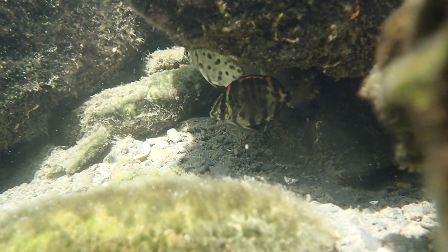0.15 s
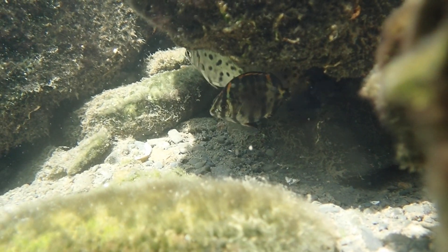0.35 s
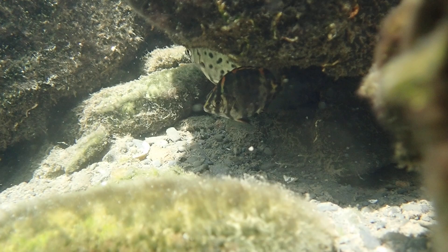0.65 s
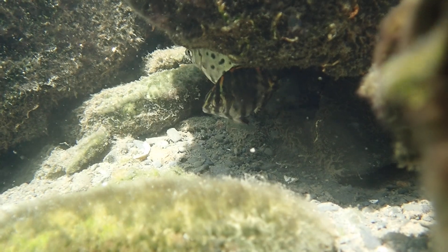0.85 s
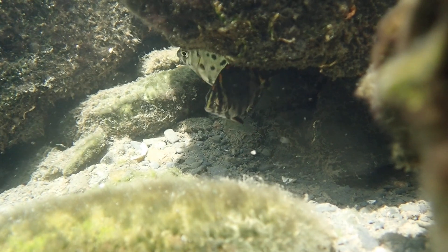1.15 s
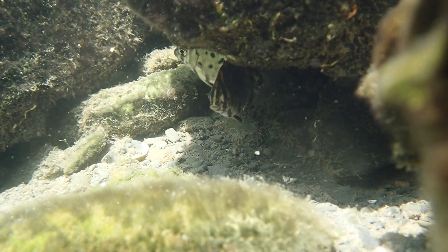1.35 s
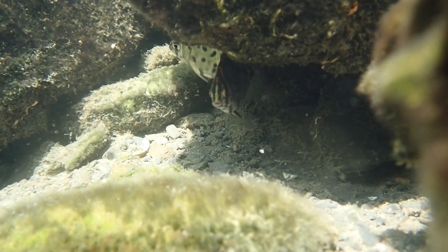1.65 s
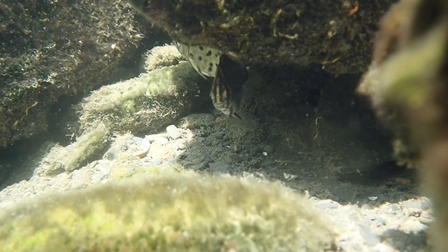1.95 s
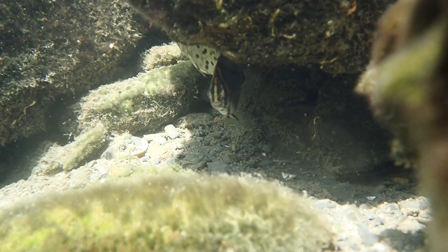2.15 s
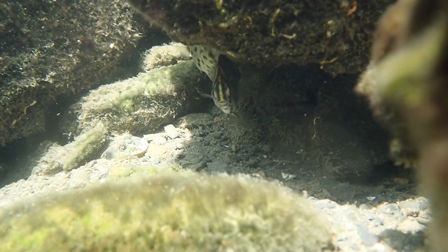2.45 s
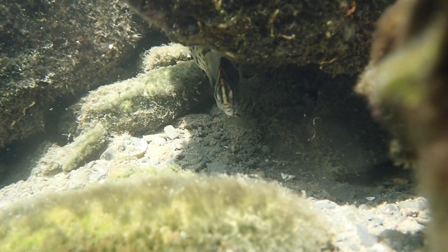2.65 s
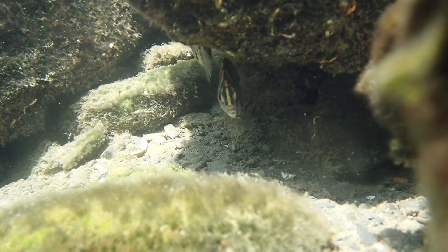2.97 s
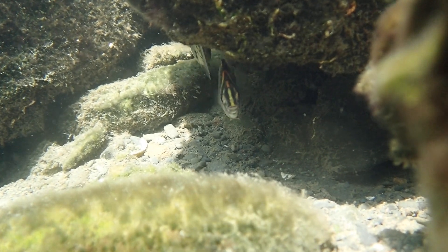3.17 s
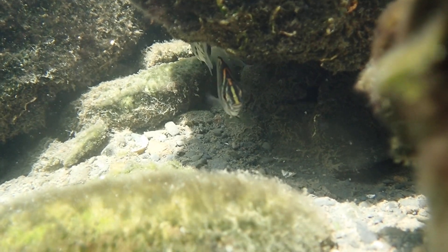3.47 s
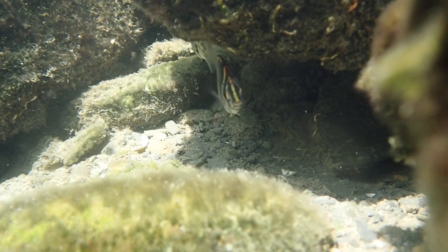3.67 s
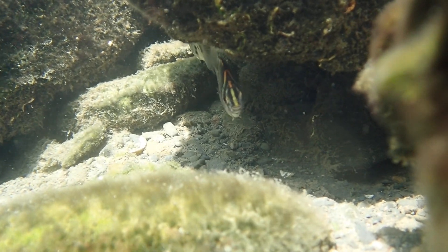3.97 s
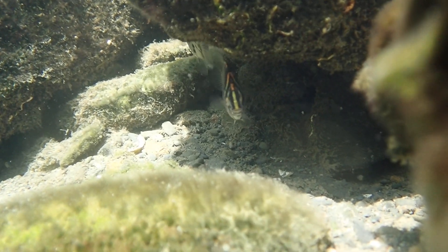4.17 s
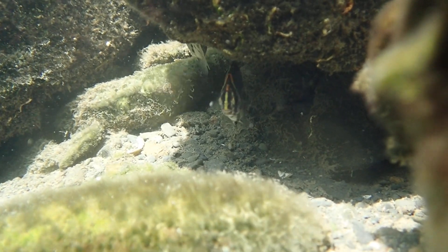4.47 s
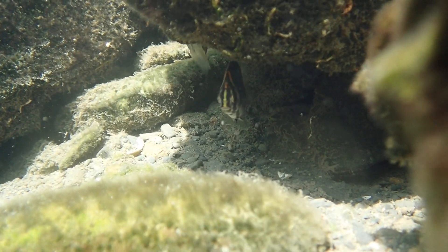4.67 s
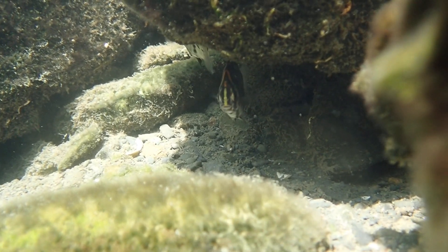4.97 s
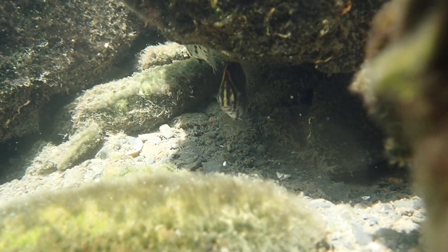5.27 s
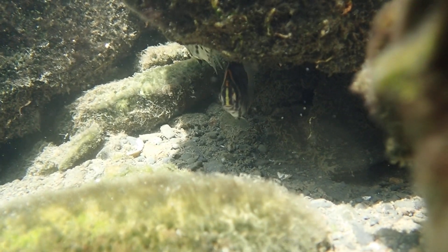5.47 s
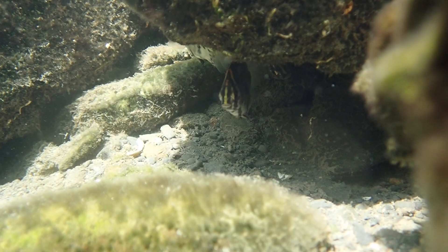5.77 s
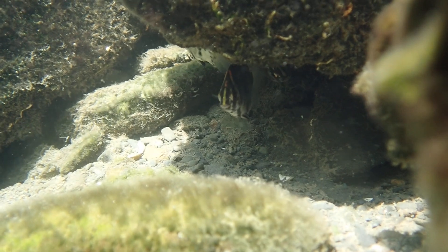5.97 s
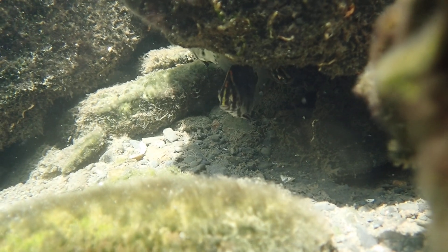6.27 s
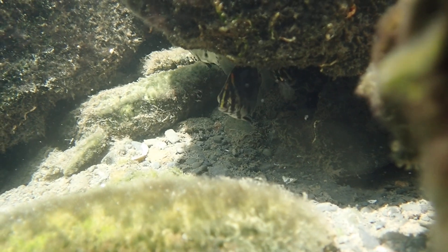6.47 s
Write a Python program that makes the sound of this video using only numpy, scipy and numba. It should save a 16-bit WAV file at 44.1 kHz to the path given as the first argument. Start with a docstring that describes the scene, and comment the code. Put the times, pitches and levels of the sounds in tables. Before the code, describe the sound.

Heard from inside a sealed camera housing underwater, a quick, irregular run of low thumps and dull clicks opens, along with brief gurgles. The knocks grow sparse while moving water rumbles and a hollow hum rises and falls. One heavy double thump follows, then another cluster of bumps as the hum swells again. Everything sounds close and muffled, with faint microphone hiss.

```python
"""Knocks thump the shell of a sealed camera housing among rocks in shallow, surging water.
Each knock swings the shell, rings the air trapped in a cavity and adds a dull crack.
The flow keeps that air humming and rumbles against the shell; water gurgles at the ports
(the openings, one per side) and grit rustles past. After each hard knock a fast limiter
turns everything down for a moment, even the microphone's hiss."""
import sys
import numpy as np
from scipy import signal
from scipy.fft import rfft, irfft, next_fast_len
from scipy.io import wavfile
from numba import njit

SR = 44100
rng = np.random.default_rng(int(sys.argv[2]) if len(sys.argv) > 2 else 0)


def store_pcm(level_fs):
    """Save levels as 16-bit WAV."""
    pcm = np.round(np.clip(level_fs, -1, 1) * 32767).astype(np.int16)
    wavfile.write(sys.argv[1], SR, np.atleast_2d(pcm).T)


N = 291965

# Knocks on the shell. Each row: start in seconds, thump level in dB, rough thump pitch in Hz,
# ring level in dB, crack level in dB, lean (each unit makes the left thump 0.46 dB above the right).
KNOCKS = [(0.077, -27, 134, -8.5, -39, 1), (0.122, -14.5, 134, -10, -41, 3), (0.148, -20, 131, -6, -29, 5),
          (0.172, -13, 160, -5.5, -24, 2), (0.197, -12, 160, -13, -43, -22),
          (0.271, 2, 190, -19.5, -33, 15.5), (0.286, -5, 160, -12, -34, -11),
          (0.352, -7, 157, -36, -50, -4), (0.395, -31, 103, -16, -28, 1), (0.412, -29, 78.5, -7.5, -29, 3),
          (0.456, -20, 120, -5.5, -37, -7), (0.471, 2, 92.6, -16, -47, -9), (0.553, -29, 283, -10, -34, -4),
          (0.62, -23, 152, -4.5, -33, -17), (0.641, -5.5, 152, -7, -51, -13), (0.68, 4, 121, 4, -12, -12),
          (0.891, -12.5, 94, -15, -59, 8), (0.91, -8, 110.5, -30, -43, 0), (0.934, 0.5, 96, -16, -44, -1.5),
          (0.984, -12, 100, -18.5, -56, 0), (1.031, 3, 91, -12, -35, 0), (1.099, 1, 102, -5.5, -22.5, 3),
          (1.169, -3.5, 173.5, -25, -54, -2), (1.206, 6.5, 85.5, -10.5, -19, 11),
          (1.306, -6, 170, -22.5, -53, -3), (1.342, -12.5, 150, -20.5, -47, -3),
          (1.53, -4, 178, -16, -25, -5), (1.549, -5.5, 150, -6.5, -29, -3),
          (1.578, -9.5, 127, -12, -42, -15), (1.609, -0.5, 139, -24.5, -56, -9.5),
          (1.664, -14.5, 161, -6.5, -40, -2), (1.692, -33.5, 276, 9.5, 0, 4.5),
          (1.71, -2, 209, 3, -10.5, -2.5), (1.751, 1.5, 164, 14.5, 2, -2), (1.785, -16, 273, 1, -24, -15),
          (1.805, -2.5, 140, 6, -62, -8), (2.073, -7, 158, -36, -61, 4), (2.093, -2.5, 158, -20, -26, -0.5),
          (2.385, -16.5, 150, -33, -61, -8), (2.779, 2.5, 105, -10, -22.5, 4),
          (3.099, -28, 156, -15, -52, -6), (3.41, -17.5, 63, -8.5, -38, -7),
          (3.557, -25, 271, -4.5, -30.5, 11), (3.61, -13.5, 57.7, -12, -38, 5),
          (3.646, 3, 152, -1.5, -20.5, -8), (3.681, 4, 229, -10.5, -28, 3.5),
          (3.705, -13, 101, 0, -50, -21.5), (4.532, 10.5, 256, 4, -9, -8.5),
          (4.557, 17, 99.4, 2.5, -9.5, -12), (5.056, -6, 153, -22, -53, -9.5),
          (5.268, -21.5, 103, -28, -59, -15), (5.312, 3, 199, 5.5, -6, 0),
          (5.409, 6, 81.8, -14.5, -23, 4.5), (5.505, 3.5, 94, -1, -37, 4), (5.82, -18, 108, -10.5, -58, -7),
          (5.907, 16, 161, -3.5, -4, -10), (6.003, 8.5, 262, 3.5, -19, 1.5),
          (6.029, -3.5, 160, -24, -28, 1), (6.052, 1, 155.6, 0, -36, 4.5),
          (6.327, -5, 151, -16.5, -61.5, -4), (6.357, 7.5, 72.3, -0.5, -43, -14.5),
          (6.402, -2.5, 112, 6, -41, 11), (6.442, -8.5, 134, 2.5, -33, 1.5),
          (6.549, 5, 134, 0.5, -15, -1.5), (6.585, 5.5, 77.6, -5.5, -40, 12)]

CAVITY_HZ, CAVITY_WIDTH_HZ = (402.9, 385.2), (38.1, 42)   # left, right
CAVITY_DB = (2, -9.5)   # the left port lies nearer the cavity
HISS_DB = (-53.5, -51)   # left, right


def thumps(cycles=0.88, sag=0.15, overshoot=1.133, settle_s=0.0052):
    """The knocked shell swings a few times, falling in pitch; the right side is later and lower."""
    out, t = np.zeros((2, N)), np.arange(SR // 5) / SR
    sides = (0.34, 0.0017, 0.9), (-0.58, 0.0021, 0.797)
    high_start = overshoot * settle_s * (1 - np.exp(-t / settle_s))
    for start, db, hz, _, _, lean in KNOCKS:
        for side, (lean_share, late_s, pitch_share) in enumerate(sides):
            turns = hz * pitch_share * (t / (1 + sag * np.sqrt(hz * t)) + high_start)
            envelope = turns / cycles * np.exp(1 - turns / cycles)
            swing = envelope * np.sin(2 * np.pi * turns)
            add(out[side], from_db(db + lean_share * lean / 2) * swing, start + late_s)
    return out


def rings(contact_hz=674):
    """Each knock gives the trapped air one soft kick and leaves it ringing."""
    kicks = np.zeros(N)
    for start, _, _, db, _, _ in KNOCKS:
        kicks[round(start * SR)] = from_db(db)
    unit_peak = np.abs(cavity(signal.unit_impulse(N))[0]).max() / from_db(CAVITY_DB[0])
    return cavity(low_pass(kicks, contact_hz)) / unit_peak


def cracks(decay_s=0.0044, dull_hz=790):
    """Each contact makes a short, dull burst of noise, the same on both sides."""
    out, t = np.zeros(N), np.arange(SR // 20) / SR
    envelope = t / decay_s * np.exp(1 - t / decay_s)
    for start, _, _, _, db, _ in KNOCKS:
        add(out, from_db(db) * envelope * rng.standard_normal(len(t)), start)
    return filtered(low_pass(out, dull_hz), 350, "high")


def cavity(push, upper_ratio=1.0748, upper_db=-1):
    """Trapped air rings when pushed; each port hears two pitches close together."""
    out = np.zeros((2, len(push)))
    for side, (base_hz, width_hz, db) in enumerate(zip(CAVITY_HZ, CAVITY_WIDTH_HZ, CAVITY_DB)):
        r = np.exp(-np.pi * width_hz / SR)
        for hz, tone_db in ((base_hz, db), (base_hz * upper_ratio, db + upper_db)):
            b = (1 - r * r) / 2 * np.array([1, 0, -1])
            a = [1, -2 * r * np.cos(2 * np.pi * hz / SR), r * r]
            ringing = signal.lfilter(b, a, push + 1e-18)
            out[side] += from_db(tone_db) * signal.lfilter(b, a, ringing)   # twice, for a steeper peak
    return out


def hum(level_db, muffle_hz=565):
    """Gusty water pressure, dulled by the shell, keeps the trapped air humming."""
    eddies = rng.standard_normal(N) * from_db(2.54 * drift(15.1))
    return from_db(level_db) * rms_one(cavity(low_pass(eddies, muffle_hz)))


def rumble(level_db):
    """Water rumbles against the shell, a little louder on the right."""
    # The rumble's tone. Each row: frequency in Hz, relative level in dB.
    spectrum = [(15, -21), (49, -1.5), (85, -5.5), (114, -10.5), (160, -5.5), (227, -21.5), (340, -16.5),
                (600, -81.5)]
    noise = banded_noise(spectrum, alike=0.64, lumpy_db=4.0, lumps_per_s=6.7)
    return from_db(level_db + [[-2.5], [1.5]]) * noise


def surge():
    """The flow rises and falls: gives the rumble and hum levels in dB at every sample."""
    # The surge. Each row: time in seconds, rumble level in dB, hum level in dB.
    flow = [(0.0, -22.5, -22.5), (0.15, -13, -26), (0.37, -23, -39), (0.74, -20, -31.5), (1.12, -20, -48.5),
            (1.31, -28, -59.5), (1.55, -19.5, -52), (1.73, -30.5, -36), (2.4, -24, -19),
            (2.75, -29.5, -38.5), (2.88, -26, -38.5), (3.23, -25, -24), (3.56, -24, -11.5),
            (4.09, -24, -21), (4.63, -31, -36.5), (4.87, -26, -33), (5.31, -23.5, -44.5),
            (5.73, -17.5, -16), (6.07, -23.5, -20.5), (6.32, -22, -10), (6.47, -14.5, -25),
            (6.62, -30, -40)]
    times, *levels = np.transpose(flow)
    return [np.interp(np.arange(N) / SR, times, db) for db in levels]


def gurgles(band_ratio=1.14):
    """Water gurgles in short swells of rough noise, partly different at the two ports."""
    # Gurgles. Each row: start in seconds, level in dB, centre pitch in Hz, length in seconds.
    swells = [(0.089, -43.5, 2060, 0.011), (0.12, -31.5, 1140, 0.0091), (0.136, -41.5, 1100, .1),
              (0.41, -20.5, 895, 0.017), (0.41, -42, 1570, 0.031), (0.555, -24, 940, 0.017),
              (0.574, -27, 1000, 0.013), (0.599, -34, 1090, 0.044), (0.623, -49.5, 2200, 0.044),
              (0.72, -46, 2050, 0.0093), (0.756, -43.5, 2120, 0.011), (2.675, -36, 1100, 0.011),
              (4.136, -42, 1000, 0.0089), (6.207, -42.5, 1020, 0.18)]
    out = np.zeros((2, N))
    for start, db, hz, length_s in swells:
        both, left, right = rng.standard_normal((3, SR // 4))
        noise = both + 0.63 * np.array([left, right])
        rough = rms_one(filtered(noise, [hz / band_ratio, hz * band_ratio], "band"))
        count = int(length_s * SR)
        add(out, from_db(db) * np.sqrt(np.hanning(count)) * rough[:, -count:] / 2, start)
    return out


def rustle(hum_db, base_db=-64, follows=0.12):
    """Grit rustles past, swelling slightly with the hum."""
    # The grit's tone. Each row: frequency in Hz, relative level in dB.
    spectrum = [(400, 3.5), (700, -18), (1000, -0.5), (1600, -37.5), (2100, -27), (4000, -37)]
    level_db = base_db + follows * (hum_db - hum_db.mean())
    return from_db(level_db) * banded_noise(spectrum, alike=0.24, lumpy_db=3.5, lumps_per_s=28)


def hiss():
    """The microphone's own steady noise, unrelated on the two sides."""
    # The hiss's tone. Each row: frequency in Hz, relative level in dB.
    spectrum = [(1000, -5.5), (1760, -9.5), (3000, -14), (4300, -21.5), (5650, -8), (6670, -9),
                (7500, -2.5), (8400, -4), (9320, -13), (10200, -10.5), (15900, -13)]
    hz, db = np.transpose(spectrum)
    size = next_fast_len(N)
    bins_hz = np.maximum(np.fft.rfftfreq(size, 1 / SR), 1)
    colour = from_db(np.interp(np.log(bins_hz), np.log(hz), db)) * (bins_hz > 300)
    noise = irfft(rfft(rng.standard_normal((2, size))) * colour, size)[:, :N]
    return from_db(HISS_DB)[:, None] * rms_one(noise)


def banded_noise(spectrum, alike, lumpy_db, lumps_per_s):
    """Half-octave bands of stereo noise that swell partly together, partly alone; power 1."""
    hz, db = np.transpose(spectrum)
    edges = hz[0] * 2 ** np.arange(0, np.log2(hz[-1] / hz[0]) + .6, .5)
    edges = edges[edges < .48 * SR]
    out, together, white = 0, drift(lumps_per_s), rng.standard_normal((2, 2, N))
    for k, (low, high) in enumerate(zip(edges, edges[1:])):
        mid, side = filtered(white[k % 2], [low, high], "band")
        level_db = np.interp(np.log(low * high) / 2, np.log(hz), db)
        gain = from_db(level_db + lumpy_db * (together + 0.5 * drift(lumps_per_s)))
        out = out + gain * (np.sqrt(1 + alike) * mid + np.sqrt(1 - alike) * side * [[1], [-1]])
    return rms_one(out)


def drift(rate_hz):
    """A slow random wander, typically about 1 in size."""
    r = np.exp(-80 * np.pi * rate_hz / SR)
    steps = rng.standard_normal(N // 40 + 2002)   # one per 40 samples
    slow = signal.lfilter([1], [1, -2 * r, r * r], steps)[2000:]
    return np.interp(np.arange(N) / 40, np.arange(len(slow)), rms_one(slow))


def filtered(x, hz, kind):
    """Keep the "low", "high" or "band" part of a sound."""
    return signal.sosfilt(signal.butter(2, hz, kind, fs=SR, output="sos"), x)


def low_pass(x, hz):
    """Dull a sound above hz."""
    return filtered(x + 1e-18, hz, "low")


def from_db(db):
    """Turn decibels into a multiplier."""
    return 10 ** (np.asarray(db) / 20)


def rms_one(x):
    """Scale to an average power of 1."""
    return x / np.sqrt(np.mean(x ** 2) + 1e-20)


def add(track, sound, start_s):
    """Mix a short sound into the track."""
    at = round(start_s * SR)
    track[..., at:at + sound.shape[-1]] += sound[..., :N - at]


def scene():
    """Knocks and gurgles over the sounds that follow the surge."""
    rumble_db, hum_db = surge()
    water = rumble(rumble_db) + hum(hum_db) + rustle(hum_db)
    knocks = thumps() + rings() + cracks()
    return knocks + water + gurgles()


@njit
def limiter_gain(peak, threshold, attack_s, release_s):
    """The volume drops fast at any peak over the threshold, then eases back."""
    attack, release = 1 - np.exp(-1 / (attack_s * SR)), np.exp(-1 / (release_s * SR))
    gain, held, cut = np.ones(len(peak)), 0., 0.
    for i in range(len(peak)):
        excess = np.log(max(peak[i] / threshold, 1.))
        held = max(held * release, excess)
        cut += attack * (held - cut)
        gain[i] = np.exp(-cut)
    return gain


def record(dry, low_cut_hz=33.8, ceiling=0.935, top_cut_hz=15730):
    """Cut the deepest bass, add hiss, limit both sides together, clip, then cut the highest treble."""
    x = filtered(dry, low_cut_hz, "high") + hiss()
    x = x * limiter_gain(np.abs(x).max(0), threshold=0.76, attack_s=0.00055, release_s=0.089)
    top_cut = signal.ellip(14, .3, 60, top_cut_hz, fs=SR, output="sos")
    return signal.sosfilt(top_cut, np.clip(x, -ceiling, ceiling))


dry = scene()
out = record(dry)
store_pcm(out)
```